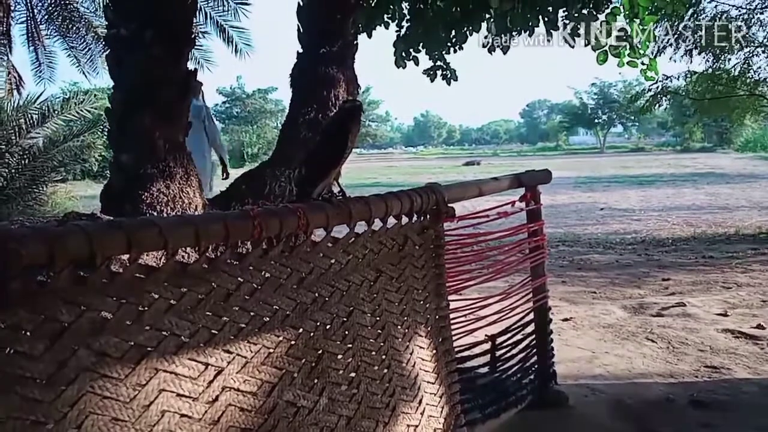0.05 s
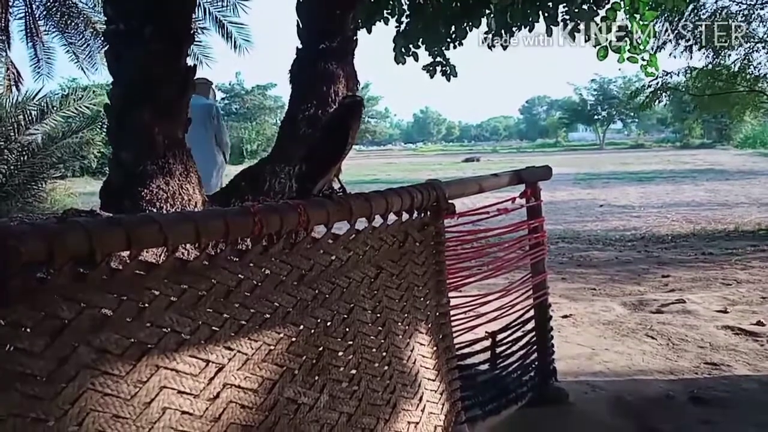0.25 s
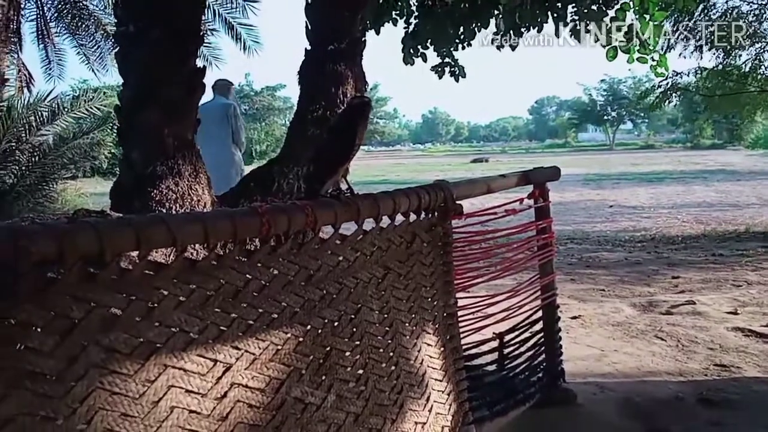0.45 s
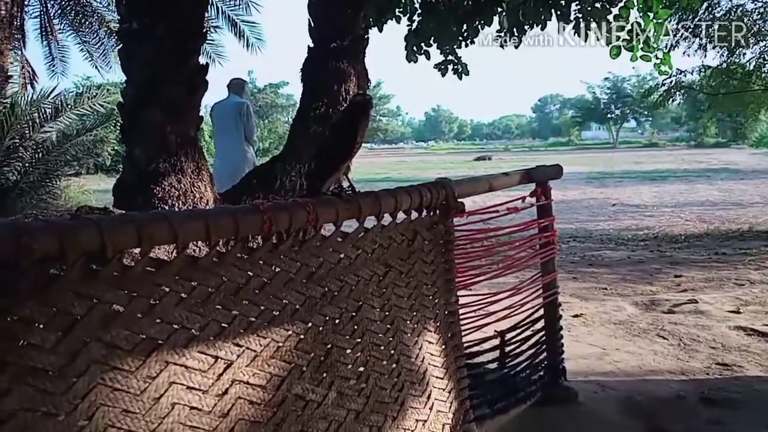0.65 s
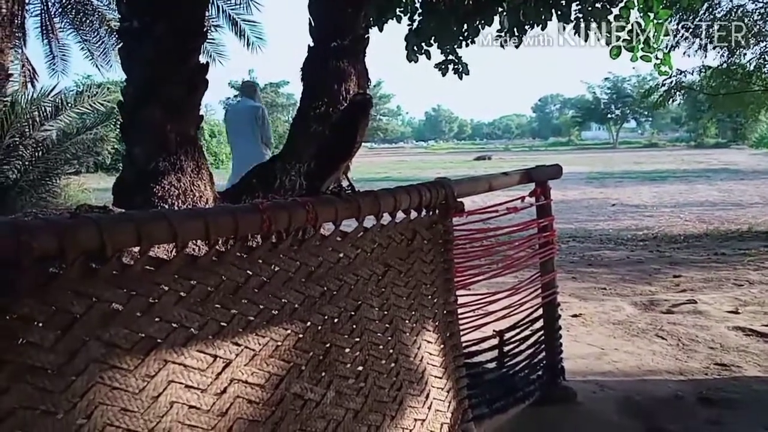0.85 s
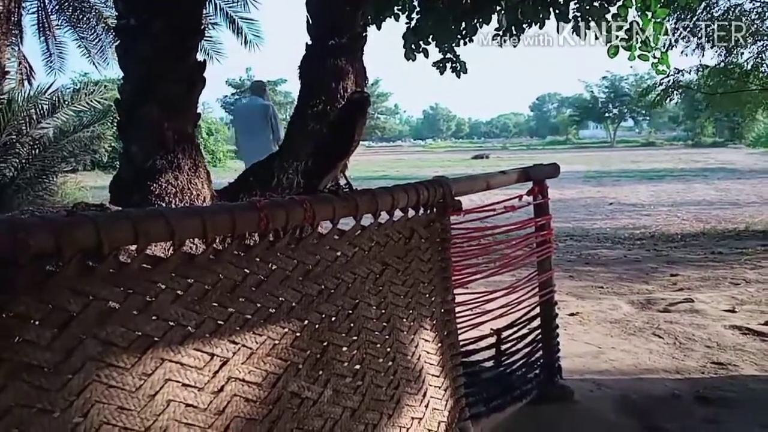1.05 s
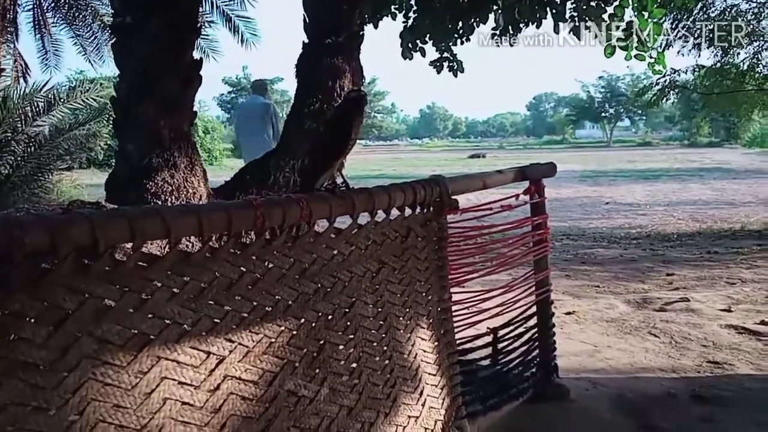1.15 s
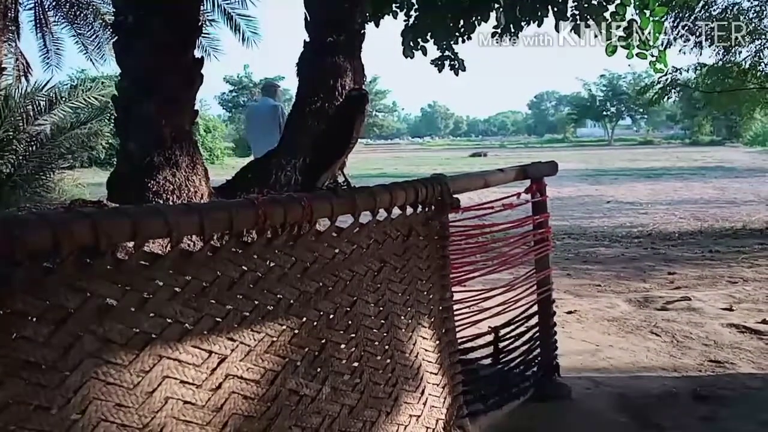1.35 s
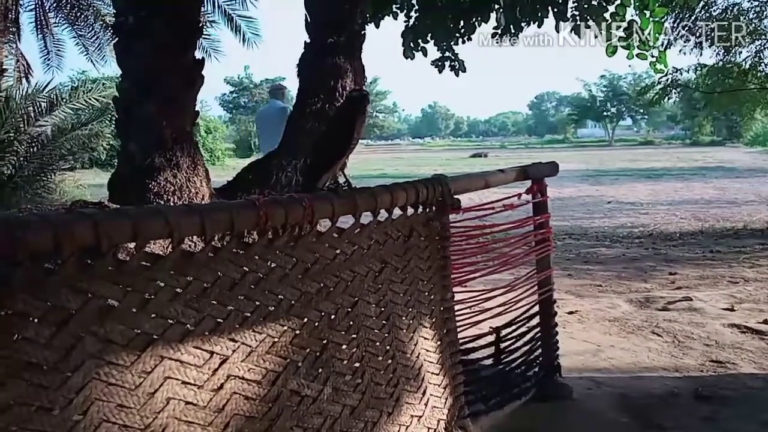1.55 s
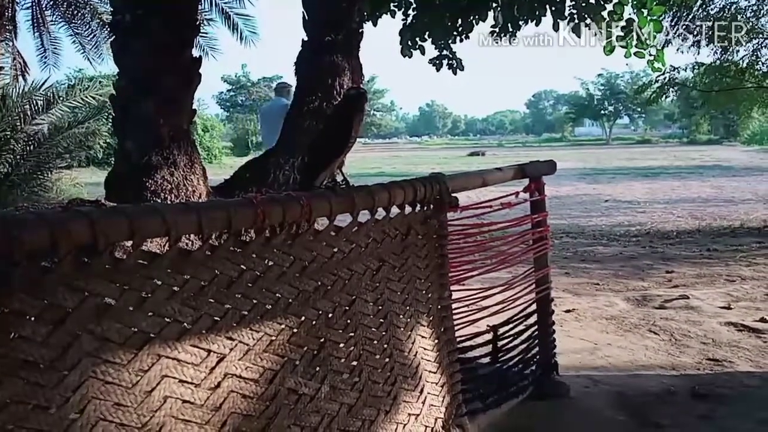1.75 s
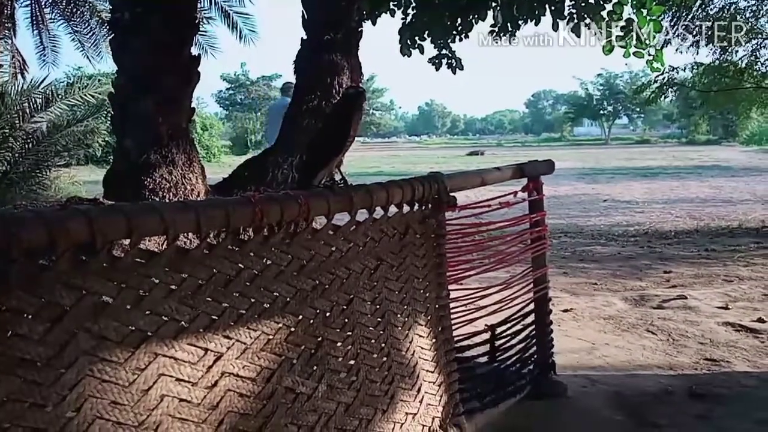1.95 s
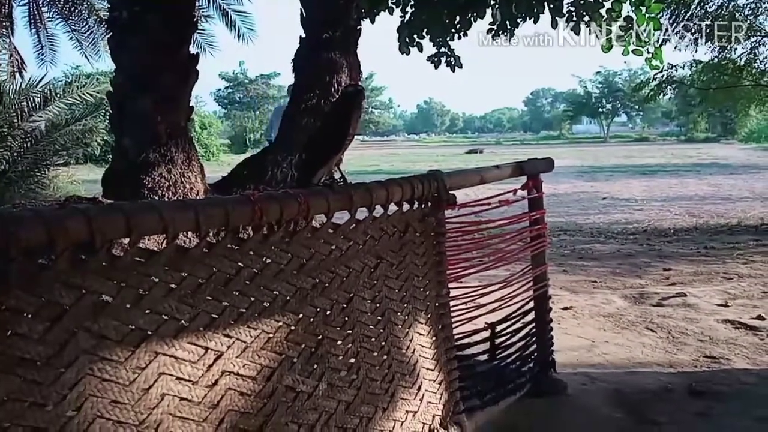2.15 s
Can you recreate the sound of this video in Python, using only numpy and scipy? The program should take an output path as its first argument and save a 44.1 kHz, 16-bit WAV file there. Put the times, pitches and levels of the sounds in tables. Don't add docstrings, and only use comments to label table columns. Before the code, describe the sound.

A hawk's loud, thin wail starts at 0.1 seconds, arches up quickly, then slides down and drops off hoarsely by 0.85, its echo lingering among trees. A far crow caws hoarsely beneath it around 0.6-0.9. Tiny songbird twitters flick by, mostly 0.9-1.3. A dry stick snaps at 1.39; two small bells jingle from 1.5 to 1.85. A distant pump thuds steadily under soft field hiss and a treble bird-and-insect chorus.

```python
import sys
import numpy as np
from scipy import signal
from scipy.fft import rfft, irfft
from scipy.io import wavfile
from scipy.ndimage import uniform_filter1d

SR = 44100
rng = np.random.default_rng(int(sys.argv[2]) if len(sys.argv) > 2 else 0)


def boost(x):
    u = np.asarray(x, float) / 20
    return 10 ** u


def waveform_to_disk(signal):
    frames = np.transpose(np.atleast_2d(signal))
    scaled = np.clip(frames, -1, 1) * 32767
    samples = np.round(scaled).astype(np.int16)
    wavfile.write(sys.argv[1], SR, samples)


N = 97020
T = np.arange(N) / SR


def level(x, db):
    return x * boost(db) / np.sqrt(np.mean(x ** 2))


def colour_db(table, hz):
    f, db = np.array(table).T
    return np.interp(np.log(np.maximum(hz, 1)), np.log(f), db)


def walk(rate):
    k = int(SR / rate)
    steps = np.repeat(rng.standard_normal(N // k + 1), k)
    w = uniform_filter1d(uniform_filter1d(steps, k), k)[:N]
    return w / w.std()


def band(x, hz, width_hz):
    return signal.lfilter(*signal.iirpeak(hz, hz / width_hz, SR), x)


def fade(t, t60):
    return np.exp(-np.log(1000) * t / t60)


def struck(taps, modes, scatter_db=0., rise_s=.0004, detune=0.):
    out = np.zeros(N)
    chances = rng.standard_normal((len(taps), len(modes), 2))
    for (s, tap_db), chance in zip(taps, chances):
        i = int(s * SR)
        t = T[:min(N - i, SR // 3)]
        rise = (1 - np.exp(-t / rise_s)) ** 2
        for (hz, mode_db, t60), (z, d) in zip(modes, chance):
            ring = np.sin(2 * np.pi * hz * (1 + detune * d) * t) * fade(t, t60)
            scatter = scatter_db * z * (hz != modes[0][0])
            out[i:i + len(t)] += boost(tap_db + mode_db + scatter) * rise * ring
    return out


def hawk():
    # (time [s], pitch [Hz])
    pitch = [(0.135, 1408), (0.281, 1623), (0.351, 1637), (0.451, 1616), (0.601, 1503), (0.749, 1339),
             (0.783, 1265), (0.803, 1205), (0.83, 1147)]
    # (time [s], effort [dB], beak tilt [dB per harmonic])
    efforts = [(0.105, -47, -13), (0.128, -9.5, -8.5), (.2, -7, -5), (0.302, 1, -2), (0.418, 3.5, -2),
               (.47, 0, -0.5), (.74, -3.5, -1), (0.826, -9.5, -3.5), (0.849, -46, 4)]
    # (frequency [Hz], level [dB])
    throat = [(1150, -9.5), (1650, -14), (2600, -7), (3270, -1), (4200, -7), (5200, -15), (6200, -16),
              (15000, -28.5)]

    s, hz = np.array(pitch).T
    hz = uniform_filter1d(uniform_filter1d(np.interp(T, s, hz), size=900), size=900)
    hz = hz - 1200 * np.clip(T - s[-1], 0, .1)
    s, db, tilt = np.array(efforts).T
    scoop_hz, scoop_s = 173.1, 0.019
    hz = hz - scoop_hz * np.exp(-np.maximum(T - s[0], 0) / scoop_s)
    jitter = .002 + .06 * np.maximum(T - .68, 0)
    hz = hz * (1 + jitter * walk(110) + .0012 * walk(20))
    effort = uniform_filter1d(np.interp(T, s, db, left=-80, right=-80), size=200)
    tilt = np.interp(T, s, tilt)
    phase = 2 * np.pi * np.cumsum(hz) / SR
    breath = boost(-48) * band(rng.standard_normal(N), 420, 1150)

    voice = np.zeros(N)
    for k in range(1, 14):
        shimmer_db = .8 * np.sqrt(k) * walk(69.59)
        db = colour_db(throat, k * hz) + effort + tilt * max(k - 3, 0) + shimmer_db
        voice += boost(db) * (k * hz < 17000) * np.sin(k * phase)
    return level(voice * (1 + 10 * breath), -29.5)


def stick():
    # (frequency [Hz], level [dB], t60 [s])
    wood = [(2420, 4.5, 0.0062), (3220, 8.5, 0.0046), (1602, -22.5, 0.052), (3910, -2, 0.0071),
            (5870, -11, 0.0039)]
    snap_s, snap_db = 1.3857, -9.5
    age = np.maximum(T - snap_s, 0)
    spray = band(band(rng.standard_normal(N), 5200, 3700), 4500, 4700)
    spray = spray * (age > 0) * boost(-35 + 2 * walk(340)) * fade(age, 0.3)
    snap = struck([(snap_s, snap_db)], wood, rise_s=0.00051) + spray
    return signal.sosfilt(signal.butter(4, 1400, "high", fs=SR, output="sos"), snap)


def bells():
    # (frequency [Hz], level [dB], t60 [s])
    high_bell = [(3805, 0, .06), (7400, -30, .12), (8290, -31, .07), (12120, -35, .15), (13300, -38, .1)]
    low_bell = [(3220, 0, .025), (6850, -9, .02), (3500, -6, .02), (7250, -15, .015)]
    # (time [s], peak level [dB])
    high_taps = [(1.529, -40), (1.545, -43), (1.599, -36.5), (1.622, -40), (1.63, -32.5), (1.642, -32.5),
                 (1.6585, -23.5), (1.675, -43.5), (1.696, -33), (1.713, -40), (1.768, -42)]
    low_taps = [(1.519, -33.5), (1.533, -33), (1.547, -48), (1.561, -40), (1.576, -31.5), (1.589, -33),
                (1.612, -33), (1.851, -47), (1.96, -62)]
    high = struck(high_taps, high_bell, scatter_db=2.5, rise_s=0.00038, detune=0.00313)
    low = struck(low_taps, low_bell, scatter_db=3., rise_s=0.0011, detune=0.03)
    return high + low


def twitters():
    # (start [s], length [s], edge pitch [Hz], top pitch [Hz], level [dB])
    arches = [(.39, .04, 3900, 7400, -55), (.924, .031, 3600, 5750, -52), (1.198, .041, 3900, 7400, -57),
              (1.241, .017, 4000, 5700, -58), (1.82, .2, 2750, 2880, -58)]
    # (start [s], length [s], first pitch [Hz], last pitch [Hz], level [dB])
    slides = [(1.017, .035, 5800, 5200, -62), (.955, .035, 2800, 2600, -56), (1.158, .022, 4400, 6500, -63),
              (1.162, .025, 3000, 5000, -61), (1.19, .012, 6300, 8400, -62), (1.18, .02, 2600, 4000, -57),
              (1.208, .012, 3000, 4200, -56), (1.215, .012, 5000, 6200, -64),
              (1.253, .018, 8200, 6200, -65), (1.26, .03, 3300, 2600, -57), (1.265, .02, 4000, 3700, -59)]
    out, flutter_db = np.zeros(N), 1.2 * walk(120)
    for rows, arched in ((arches, True), (slides, False)):
        for s, length, from_hz, to_hz, db in rows:
            i = int(s * SR)
            u = T[:int(length * SR)] / length
            path = 1 - np.abs(2 * u - 1) ** 3 if arched else u
            hz = from_hz + (to_hz - from_hz) * path
            whistle = np.sin(2 * np.pi * np.cumsum(hz) / SR)
            loudness = boost(db + flutter_db[i:][:len(u)]) * np.sin(np.pi * u) ** .5
            out[i:][:len(u)] += loudness * whistle
    return out


def crow():
    # (frequency [Hz], width [Hz], level [dB])
    crow_throat = [(530, 270, -4.5), (1203, 196, 4), (1620, 490, -6), (2260, 260, -11)]
    start_s, length_s, pitch_hz = .6, .29, 260
    u = np.clip((T - start_s) / length_s, 0, 1)
    cycle = np.cumsum(pitch_hz * (1 + 0.11 * walk(150))) / SR % 1
    rasp = np.exp(-cycle / 0.44) * rng.standard_normal(N)
    caw = sum(boost(db) * band(band(rasp, hz, w), hz, w) for hz, w, db in crow_throat)
    return level(caw, -51) * np.sin(np.pi * u) ** 0.13


def yard(x):
    # (delay [s], level [dB])
    echoes = [(.004, -13), (.0065, -17), (.013, -19), (.017, -21), (.021, -20), (.027, -23)]
    t = T[:SR]
    near, far = rng.standard_normal((2, SR)) * (t > .003)
    near, far = near * fade(t, 0.18), far * fade(t, 0.79)
    h = near / np.linalg.norm(near) * boost(-3.5) + far / np.linalg.norm(far) * boost(-14)
    for s, db in echoes:
        h[int(s * SR)] += boost(db)
    h = signal.lfilter(*signal.butter(1, 2480, "high", fs=SR), h)
    return signal.fftconvolve(x, h)[:N]


def pump():
    # (frequency [Hz], level [dB], t60 [s])
    exhaust = [(105.7, -2.5, 0.16), (158.7, -12.5, 0.1), (214.4, -19.5, .12), (69, -14, 0.3)]
    # (time [s], peak level [dB])
    thuds = [(0.087, -53), (0.183, -46), (0.297, -47.5), (0.397, -47), (0.498, -48), (0.612, -47),
             (0.703, -45), (0.811, -46), (0.919, -47), (1.017, -49), (1.127, -52), (1.223, -52.5),
             (1.329, -50.5), (1.436, -47.5), (1.546, -49.5), (1.64, -45), (1.747, -49), (1.849, -52),
             (1.958, -47.5), (2.049, -48.5)]
    first = (0.0084, thuds[0][1] - 3)
    last = (thuds[-1][0] + 1 / 9.67, thuds[-1][1])
    firings = [first] + thuds + [last]
    return level(struck(firings, exhaust, scatter_db=2.5, rise_s=0.0023, detune=0.036), -54.5)


def hiss(table, db, swell_db, flicker_db):
    f, out, swell = np.fft.rfftfreq(N, 1 / SR), 0, walk(3.02)
    lowest, highest = table[0][0], table[-1][0]
    noise = rfft(rng.standard_normal(N)) * boost(colour_db(table, f)) * (f > lowest)
    for c in np.arange(np.log2(lowest), np.log2(highest) + .5, .5):
        share = np.cos(np.pi * np.clip(np.log2(f + 1) - c, -.5, .5)) ** 2
        out = out + irfft(noise * share, N) * boost(swell_db * swell + flicker_db * walk(14))
    return level(out, db)


def far_chorus():
    # (frequency [Hz], level [dB])
    chorus = [(1500, -36.5), (2200, -11.5), (3400, -0.5), (4200, -6.5), (4900, -22), (7300, -12.5),
              (8200, -27), (15300, -25.5)]
    # (time [s], level [dB])
    chorus_swell = [(0, -0.6), (.5, 11.3), (1.0, -0.1), (1.3, 1.5), (1.6, 1.5), (1.9, -2), (2.2, -3.5)]
    return hiss(chorus, -56, 0.93, 1.4) * boost(np.interp(T, *np.array(chorus_swell).T))


def fields():
    # (frequency [Hz], level [dB per Hz])
    field = [(40, -29), (70, -10.5), (110, -2), (270, -13.5), (500, -19), (1000, -19.5), (2000, -14)]
    return hiss(field, -54, 0.93, 0.48)


def scene():
    call, click, jingle, birds, caw = hawk(), stick(), bells(), twitters(), crow()
    sent = boost(3.5) * call + boost(-0.5) * click + boost(0.5) * jingle + boost(3) * caw + boost(-6) * birds
    near = call + click + jingle + caw + birds + yard(sent)
    return (near + pump() + fields() + far_chorus())[None]


def top_cut(x):
    return signal.sosfilt(signal.butter(12, 15400, fs=SR, output="sos"), x)


def record(dry):
    x = dry - .4 * band(dry, 5400, 600)
    x = signal.sosfilt(signal.butter(2, [52, 12000], "band", fs=SR, output="sos"), x)
    x = signal.sosfilt(signal.ellip(10, .2, 80, 15300, fs=SR, output="sos"), x)
    return top_cut(x)


dry = scene()
out = record(dry)
waveform_to_disk(out)
```